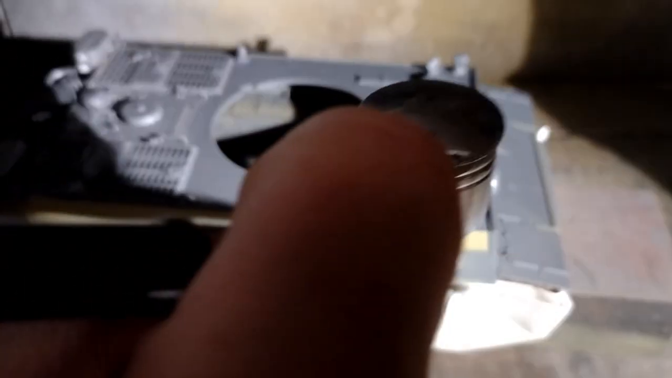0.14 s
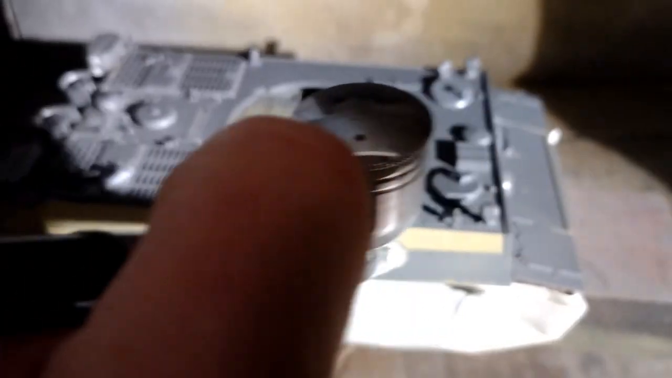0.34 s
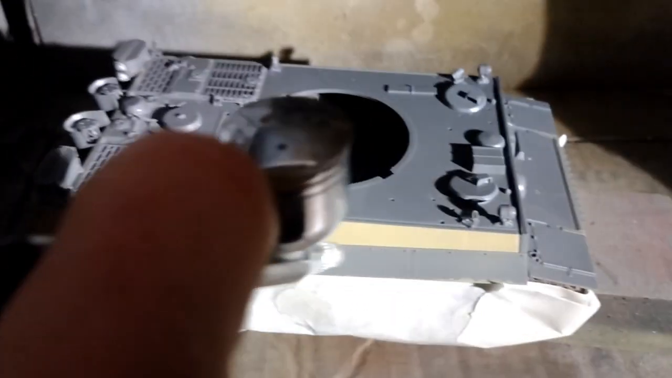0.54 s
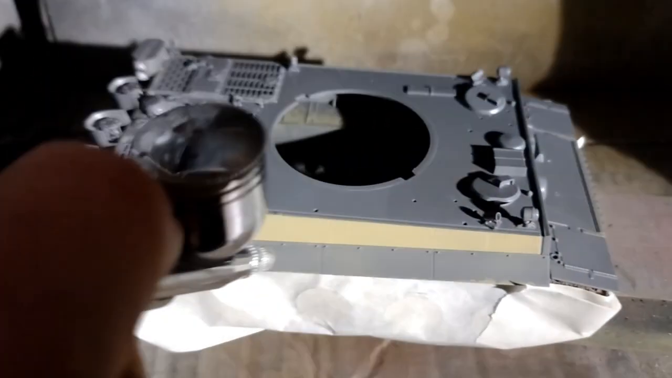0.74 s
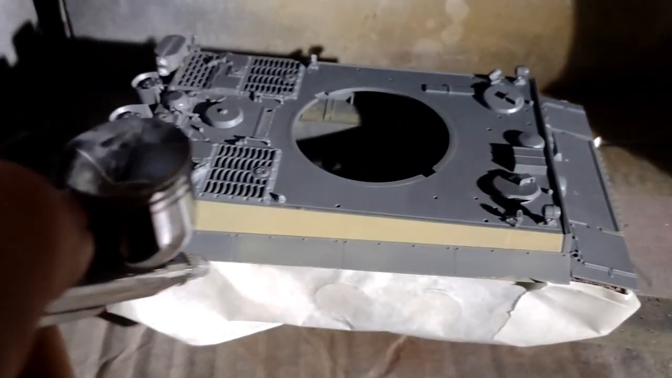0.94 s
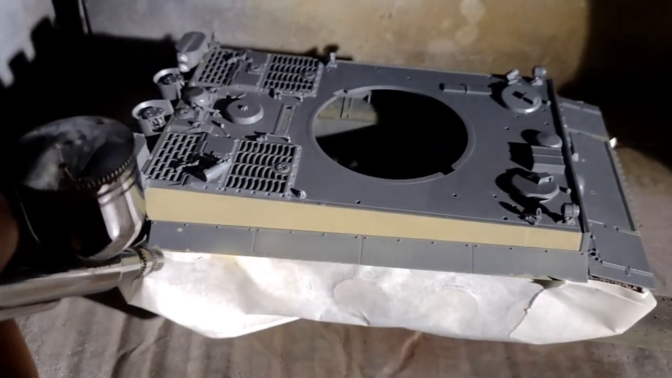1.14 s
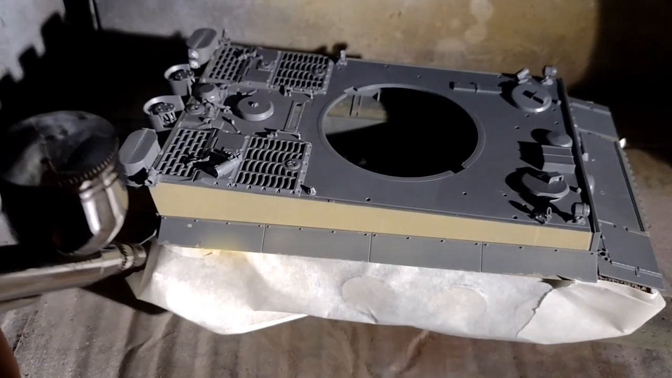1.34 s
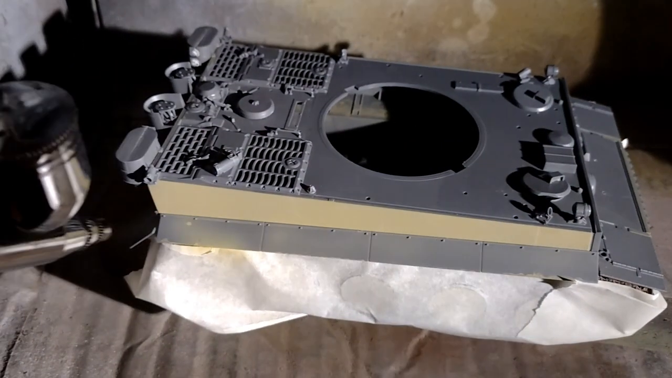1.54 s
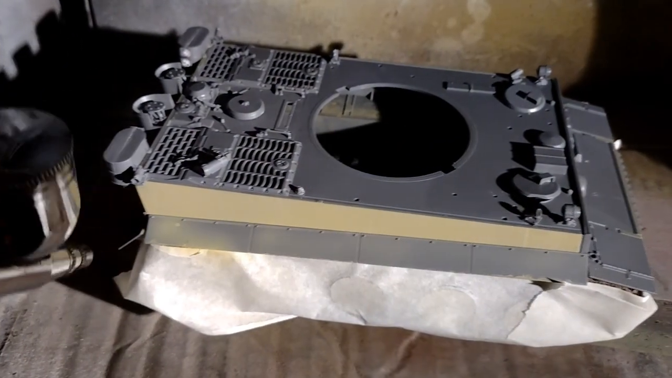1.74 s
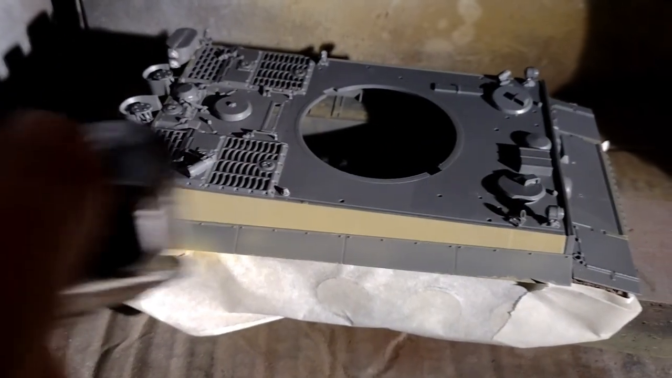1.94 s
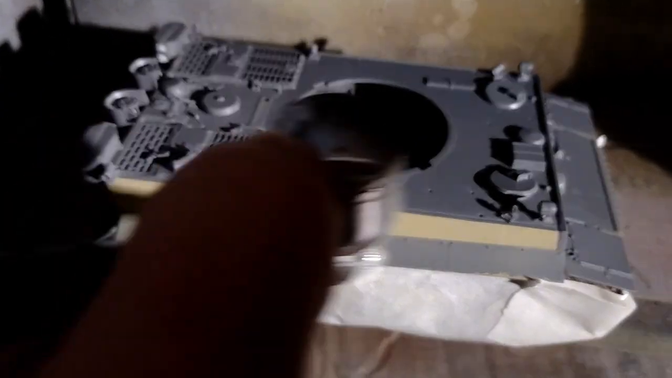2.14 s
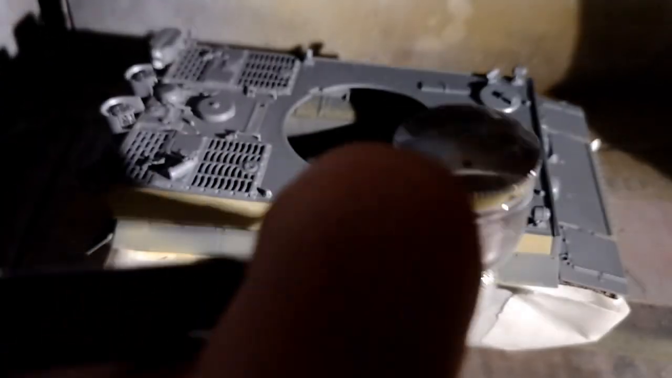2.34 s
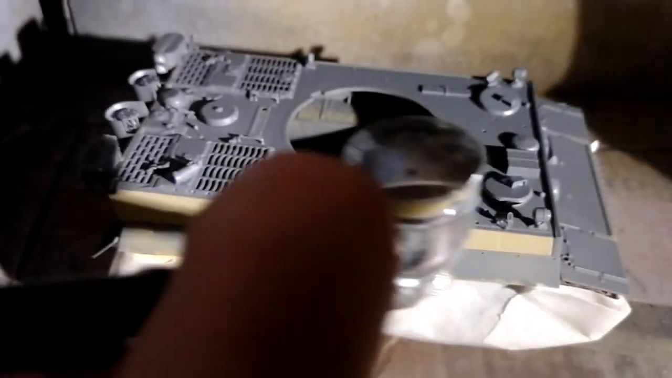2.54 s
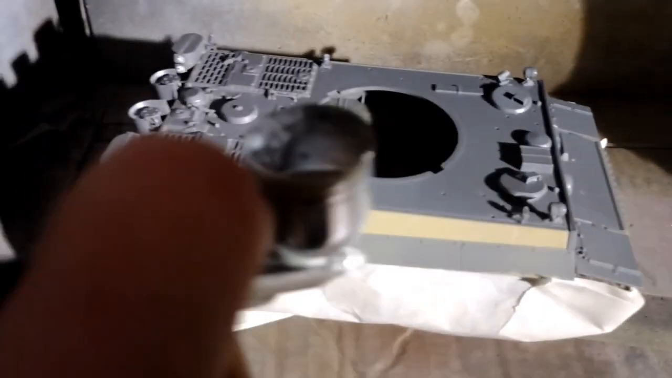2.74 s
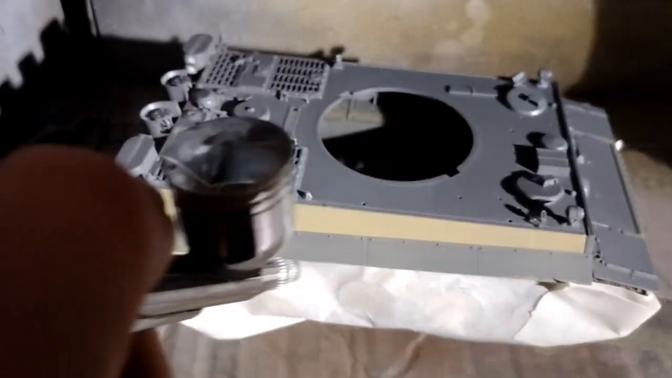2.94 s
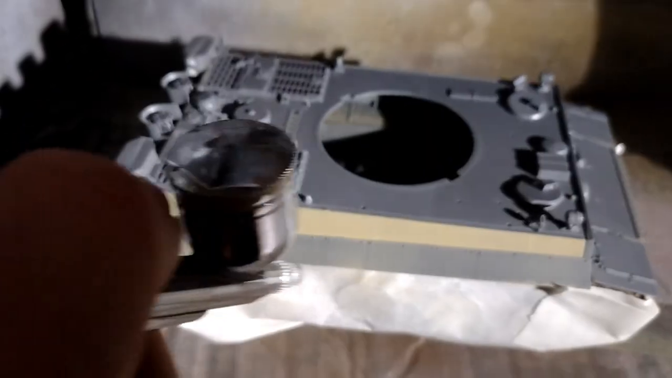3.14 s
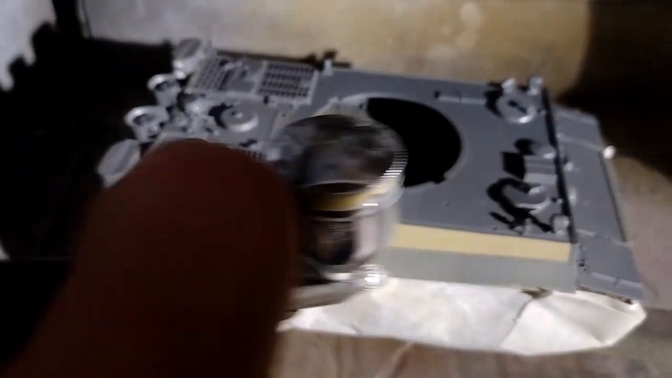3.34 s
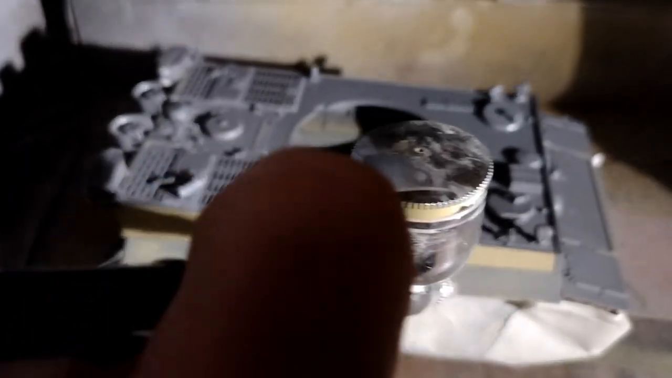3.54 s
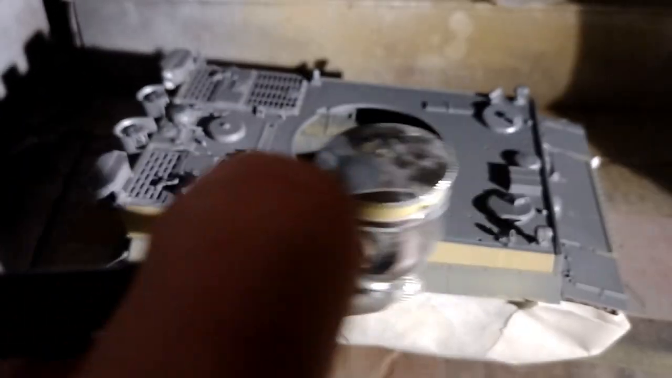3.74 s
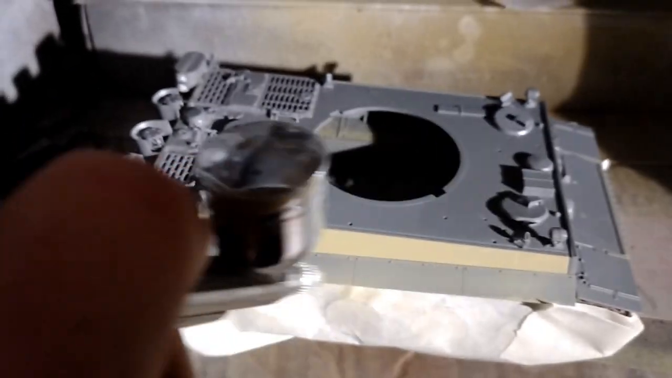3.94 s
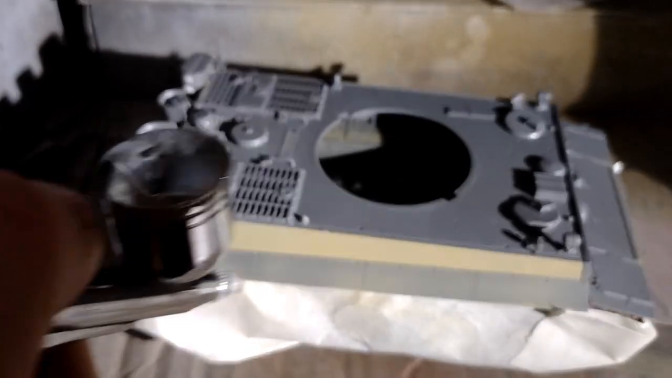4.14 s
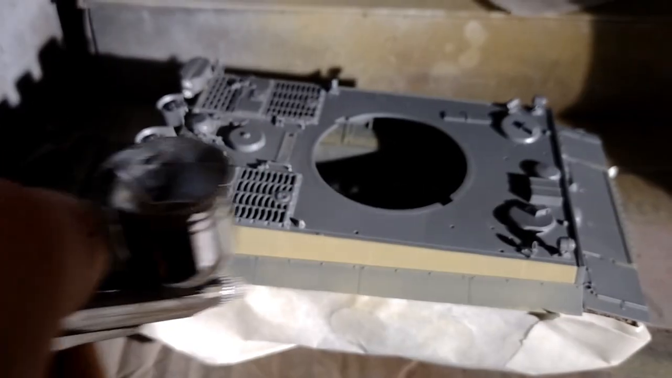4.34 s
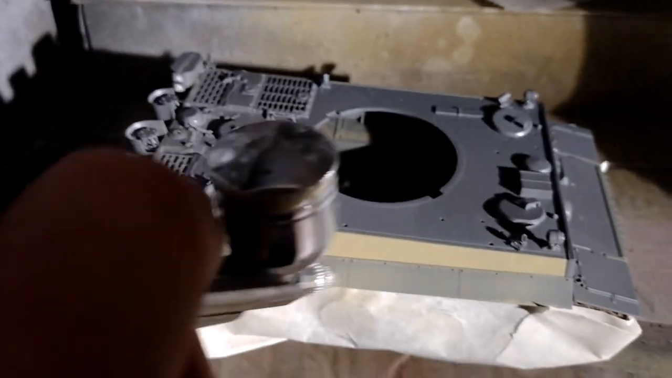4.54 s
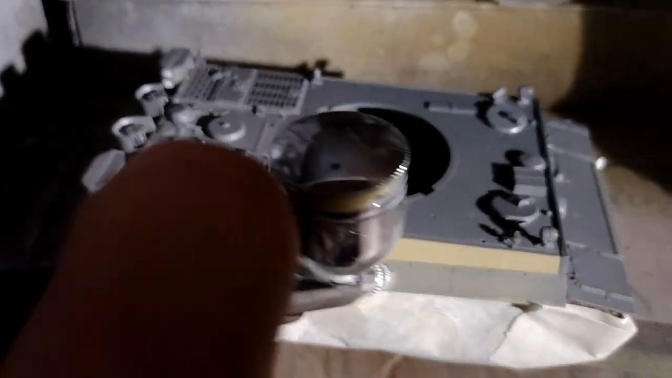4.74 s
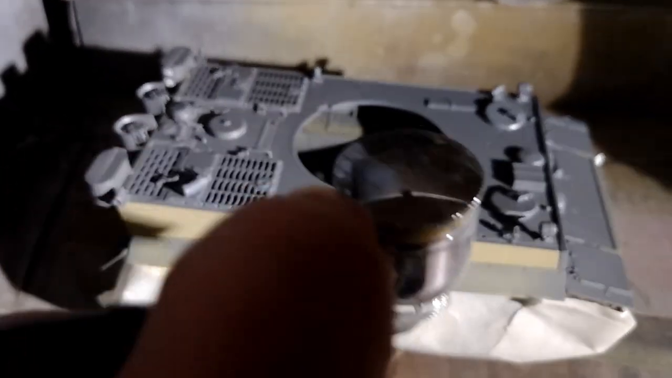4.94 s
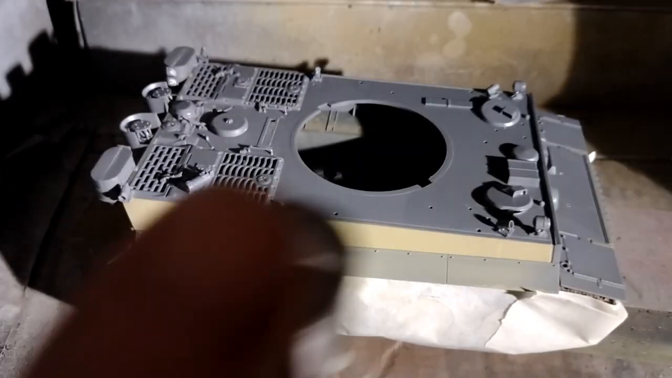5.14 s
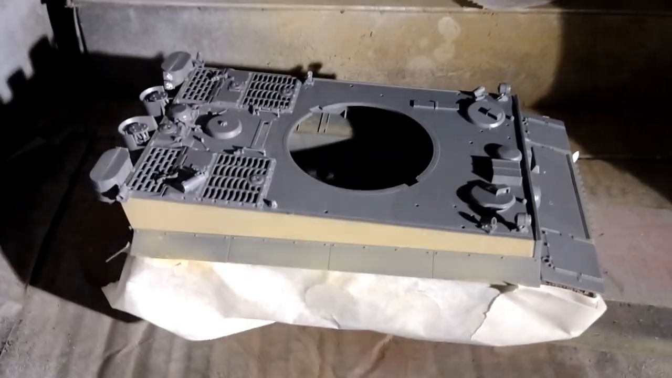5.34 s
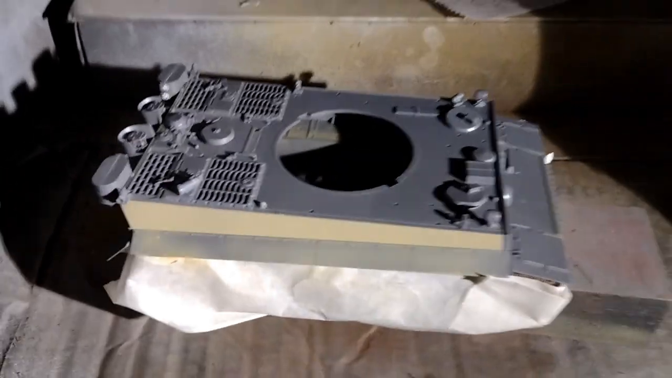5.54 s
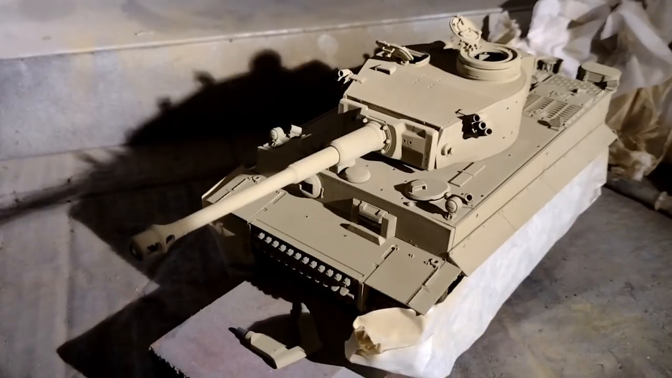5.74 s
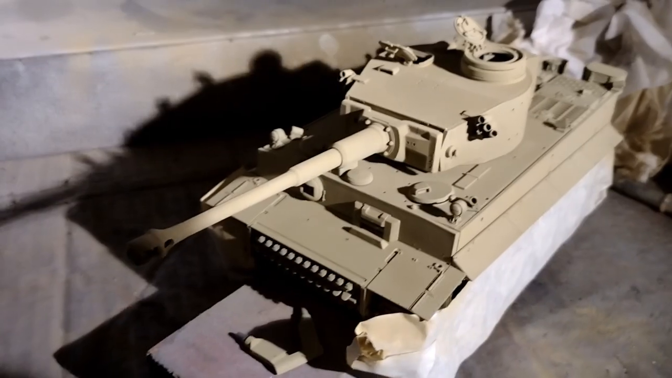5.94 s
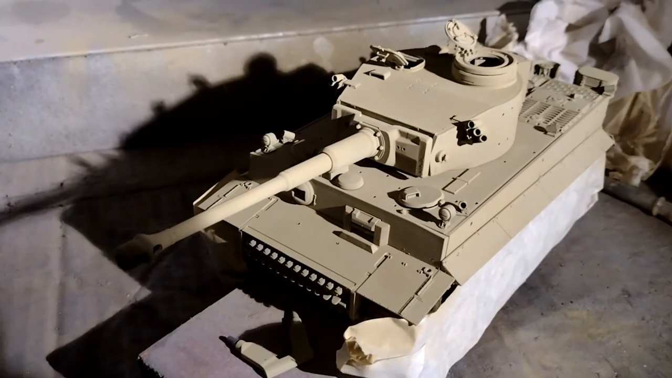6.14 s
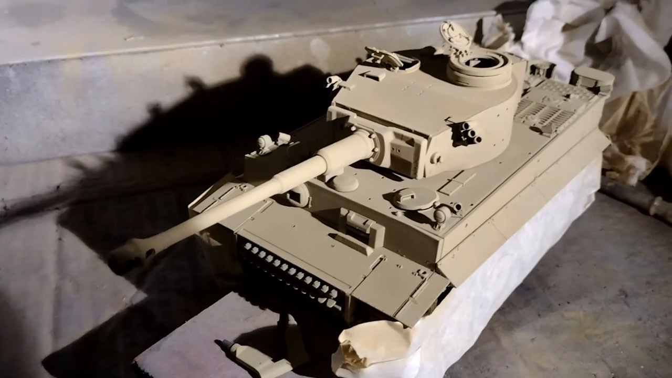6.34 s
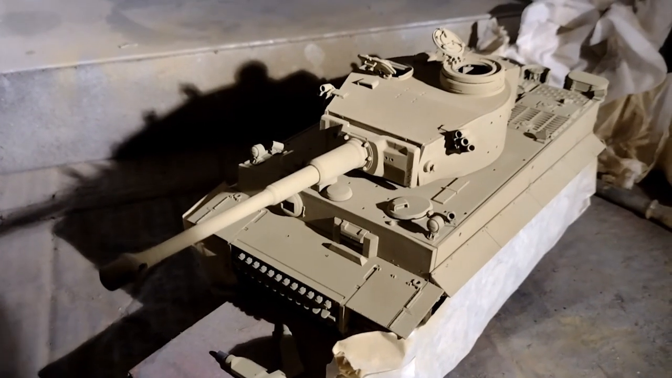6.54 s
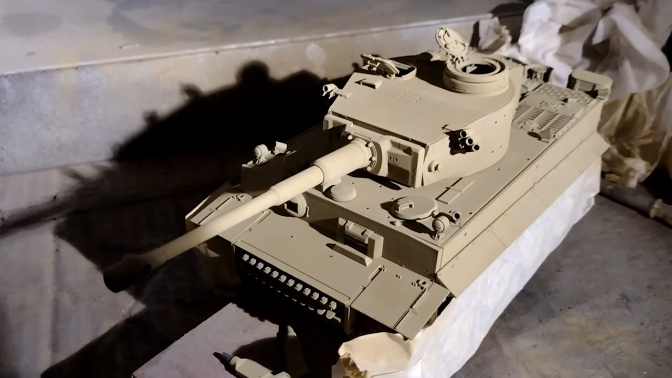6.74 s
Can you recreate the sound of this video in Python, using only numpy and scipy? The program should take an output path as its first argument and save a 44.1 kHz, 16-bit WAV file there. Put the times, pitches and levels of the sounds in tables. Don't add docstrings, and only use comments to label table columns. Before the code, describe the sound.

A piston compressor runs from the start across a workshop, a rapid buzzing chug of about twenty beats a second. At 0.1 s a close airbrush opens abruptly into bright, airy hiss, with a hollow mid roar where the jet strikes the model; it moves and changes colour with the hand until a small spit and release at 1.85. Dull soft knocks sit near 0.7, 1.3 and 2.35. The compressor alone fills the gap, then a second spray runs from 2.3 to 5.15, wavering, the compressor partly ducked beneath it. The compressor recovers until about 5.6, then cuts to silence. At 5.85 a very quiet room fades in with faint low hum. Paper rustles and skin rubs from 5.93 to 6.2 amid light finger taps. A loud crisp lid snap at 6.2 leaves a short wash off the walls; small parts click and bounce around 6.37-6.39, then sparse faint ticks fade away.

```python
import sys
import numpy as np
from scipy import signal
from scipy.fft import rfft, irfft, next_fast_len
from scipy.io import wavfile
from scipy.ndimage import uniform_filter1d

SR = 44100
rng = np.random.default_rng(int(sys.argv[2]) if len(sys.argv) > 2 else 0)


def rack_gain(trim_db):
    fader = np.asarray(trim_db, float)
    return 10 ** (fader / 20)


def waveform_to_disk(signal):
    frames = np.transpose(np.atleast_2d(signal))
    scaled = np.clip(frames, -1, 1) * 32767
    samples = np.round(scaled).astype(np.int16)
    wavfile.write(sys.argv[1], SR, samples)


N = 298998
T = np.arange(N) / SR

# [multiple of shaft speed, level/dB]
SHAFT_ORDERS = [(1, -28), (2, -26.5), (3, -11.5), (4, -14), (5, -2.5), (6, -0.5), (7, -4.5), (8, -6.5),
                (9, -0.5), (10, -9.5), (11, -28), (12, -21), (13, -8.5), (14, 2), (15, 4.5), (16, -9.5),
                (17, 1.5), (18, 3), (19, -6.5), (20, -30), (21, -20), (22, -32), (23, -7.5), (24, -13),
                (25, -22), (26, -23), (27, -13.5), (28, -13.5), (29, -22.5), (30, -27.5)]
# [f/Hz, width/Hz, level/dB]
REED = [(3460, 120, -35.5), (3700, 38, -33)]
# [f/Hz, density/dB per Hz]
MOTOR_SPECTRUM = [(30, -39), (50, -27), (70, -14), (180, -18), (240, -23), (340, -24), (450, -26.5),
                  (600, -20.5), (780, -15.5), (920, -16), (1100, -28), (1300, -26), (1480, -30),
                  (1650, -24), (2300, -25.5), (2650, -35), (4000, -58.5), (8000, -80)]
# [f/Hz, density/dB per Hz]
PUFF_SPECTRUM = [(2300, -30), (2900, -5), (3300, -9), (3520, -1), (3700, -10), (3850, -5), (4130, -13),
                 (4800, -3), (5200, -7), (5600, 1), (6300, -7), (7100, 1), (7700, -4), (8400, 1),
                 (11000, -6), (15800, -10)]
# [f/Hz, likeness 0-1]
MOTOR_LIKENESS = [(60, 1), (500, 0.93), (950, 0.084), (3800, 0.01)]
# [f/Hz, left-right level/dB]
PORT_COLOUR = [(60, -3), (150, -3), (380, -3.5), (950, -1.5), (2380, -4), (5980, -8.5), (15000, 5.5)]

# [pressed t/s, released t/s]
TRIGGER_PULLS = [
    (0.105, 1.855),
    (2.323, 5.146),
]
# [f/Hz, density/dB per Hz]
JET_SPECTRUM = [(240, -32.5), (430, -18.5), (614, -9), (797, -14), (960, -3), (1050, -9), (1180, -3),
                (1600, -5.5), (2250, -3.5), (2550, -6), (3000, -3), (3390, -7), (3650, -3.5), (4300, -4),
                (5850, -3.5), (6600, -1.5), (9410, 0), (13800, -2.5), (15700, -3.5)]
# [f/Hz, left-right level/dB]
JET_PORT_COLOUR = [(400, 0), (2500, -2.5), (3500, -6), (5000, -7.5), (7000, -3.5), (8500, -2.5),
                   (11000, -2), (14000, 1.5), (16000, -6.5)]
# [f/Hz, likeness 0-1]
JET_LIKENESS = [(400, 0.59), (1000, 0.88), (2000, 0.7), (4000, 0.5), (8000, .4), (12000, 0.37)]
# [f/Hz, phase/rad]
PORT_LEAD = [(1100, 0), (2000, 0.2), (3600, 4.5), (5500, 8.5), (8000, 13), (11000, 16.5), (13500, 20.5),
             (16000, 24.5)]
# [t/s, share of the path difference]
HAND_REACH = [(.13, 0.35), (.5, 0.53), (.8, 0.77), (1.1, 0.91), (1.45, 0.97), (1.83, 1), (2.35, 0.52),
              (2.7, 0.56), (2.95, .9), (3.15, 1.1), (3.35, 0.88), (3.6, 0.52), (3.85, 0.52), (4.1, 0.85),
              (4.35, 1.08), (4.6, 1.03), (4.85, 0.52), (5.13, 0.54)]
# [t/s, flow level/dB, turn from the left port, left-right level/dB]
NOZZLE_MOVES = [(.13, -22.5, -1.5), (.3, -20.5, -5), (.54, -18.5, -8.5), (.66, -21.5, -10.5),
                (.72, -20, -17.5), (.84, -19.5, -20.5), (.93, -20.5, -16), (1.02, -20, -12),
                (1.2, -24.5, -5.5), (1.45, -23, -7), (1.7, -25, -16.5), (1.83, -24.5, -6),
                (2.35, -19.5, -6.5), (2.55, -20.5, -10.5), (2.65, -24, -9.5), (2.73, -21.5, -9.5),
                (2.8, -22.5, -11.5), (3.08, -23.5, -18), (3.4, -24.5, -11.5), (3.52, -23, -23),
                (3.65, -23.5, -20), (3.74, -20.5, -16), (3.91, -24.5, -10), (3.99, -24, -16.5),
                (4.085, -21.5, -20), (4.12, -24.5, -9), (4.2, -25, -7), (4.225, -21, -14), (4.3, -21.5, -6),
                (4.36, -22.5, -2.5), (4.44, -21, -12), (4.55, -22, -12), (4.64, -23.5, -16),
                (4.75, -22, -20), (4.95, -23.5, -13), (5.13, -22, -10)]
# [t/s, centre of the hiss f/Hz, share of the cap's ring]
CAP_MOVES = [(.13, 8250, 0.03), (.5, 7500, .1), (1.0, 7540, .1), (1.5, 7360, .2), (1.7, 7500, .2),
             (1.83, 7700, 0.19), (2.35, 7300, 0.5), (2.9, 7140, 0.9), (3.12, 7300, .3), (3.3, 7160, .8),
             (3.5, 7100, 1.2), (3.7, 7600, .9), (3.9, 7000, 1), (4.1, 6950, 1), (4.27, 7300, .2),
             (4.5, 7200, .2), (4.7, 6800, 1.2), (5.13, 7030, 1)]
# [t/s, level/dB, hollow's pitch f/Hz, left-right level/dB, breadth/log pitch]
SURFACE_HITS = [(.13, -27, 1810, 0, 0.79), (.22, -33, 1780, -0.5, 0.68), (.4, -29.5, 1710, -1, 0.96),
                (.55, -31.5, 1560, -2, 0.45), (.73, -33, 1470, -2, 0.74), (.86, -33.5, 1530, -7, .5),
                (.95, -34, 1470, -8.5, 0.33), (1.02, -26, 1530, -7.5, 0.26), (1.14, -22, 1700, 0, 0.51),
                (1.25, -22.5, 2250, -7.5, 0.5), (1.33, -29, 2150, -7, 0.8), (1.45, -30, 2590, -7, 0.55),
                (1.57, -27.5, 2840, -13.5, 0.51), (1.7, -31.5, 2670, -13.5, 0.39),
                (1.83, -30.5, 2620, -13, 0.53), (2.35, -36, 1800, 1.5, 0.53), (2.45, -32, 1470, 2, 0.7),
                (2.55, -26.5, 1530, 1.5, 0.68), (2.65, -29, 1390, 2, 0.68), (2.75, -26.5, 1460, -2.5, 0.48),
                (2.85, -32, 1360, -3, 0.39), (3.0, -27.5, 1390, -7.5, 0.51), (3.15, -26, 1560, -3.5, 0.36),
                (3.33, -27.5, 1440, -8, 0.58), (3.55, -35, 1400, -5, 0.52), (3.75, -31.5, 1560, -1.5, 0.54),
                (3.95, -37.5, 1500, -1, 0.42), (4.06, -32, 1500, -8.5, 0.3), (4.16, -33.5, 1570, -6, 0.3),
                (4.3, -29, 1620, -9, 0.3), (4.45, -31.5, 1550, -2, 0.39), (4.6, -34, 1510, -8, 0.4),
                (4.75, -36.5, 1570, -4, 0.44), (4.9, -39, 1540, -3.5, 0.54), (5.13, -32.5, 1540, 3.5, 0.48)]
# [t/s, f/Hz, strength/dB]
SURFACE_ECHO = [(.13, 13300, 1.5), (.36, 11800, 1), (.45, 11400, 5.5), (.55, 11300, 0.5), (.8, 12500, -1),
                (.88, 14500, 2.5), (1.0, 15400, 5), (1.07, 14900, 3.5), (1.2, 14300, 4), (1.8, 14500, 2),
                (2.35, 13500, -0.5), (2.7, 13600, -1.5), (2.85, 13700, 4), (3.0, 14100, 6.5),
                (3.12, 14800, 3), (3.33, 14100, 5.5), (3.55, 13800, 3), (3.8, 14300, 5), (3.95, 14000, 2),
                (4.07, 13800, 8.5), (4.18, 14100, 3.5), (4.3, 15040, 7), (4.48, 15100, 7), (4.58, 14200, 8),
                (4.67, 13660, 8), (4.75, 14500, 7), (4.82, 14000, 5), (4.9, 13600, 6), (5.13, 14000, 1)]
# [left delay/ms, right delay/ms, level/dB]
BENCH_ECHOES = [(1.55, 0.59, -29.5), (4.7, 5.2, -15.5), (8.3, 7.7, -13.5)]
# [t/s, level/dB, length/s]
PAINT_SPITS = [
    (1.823, 3, 0.0017),
    (1.817, 2, .006),
    (.948, 1.5, .002),
]
# [t/s, level/dB, f/Hz]
BENCH_KNOCKS = [
    (.668, -27, 190),
    (1.335, -32, 210),
    (2.345, -33, 500),
]

# [t/s, level/dB]
ROOM_LEVEL = [(5.84, -77.5), (5.92, -68), (6.1, -58.5), (6.4, -63), (6.6, -66.5), (6.78, -69)]
# [f/Hz, density/dB per Hz]
AIR_SPECTRUM = [(24, -36), (40, -12.5), (104, -5), (297, -16), (422, -18.5), (1370, -21), (2840, -21),
                (6330, -21.5), (7170, -20), (16000, -26)]
# [f/Hz, level/dB]
HUM_TONES = [(102.3, -73.5), (296.1, -84)]
# [f/Hz, density/dB per Hz]
RUSTLE_SPECTRUM = [(1470, -47), (2500, -16), (3310, -22), (4270, -10), (6400, -1), (6970, -2),
                   (16000, -1.5)]
# [f/Hz, density/dB per Hz]
RUB_SPECTRUM = [(88, -68), (150, -32.5), (347, -3.5), (414, -28), (452, -11.5), (684, -2), (746, -9),
                (3000, -19), (3900, -65), (6600, -120)]
# [t/s, hold/s, rustle level/dB, rubbing level/dB]
HAND_STROKES = [
    (5.928, .004, -57, -61),
    (5.972, .008, -50.5, -56),
    (6.018, 0.046, -53, -52),
    (6.08, .03, -75, -58),
    (6.148, .065, -52, -48.5),
]
# [t/s, peak level/dB, f/Hz]
FINGER_TAPS = [(5.932, -53, 8070), (5.935, -52, 1800), (5.953, -54, 1400), (5.953, -52, 2500),
               (5.973, -45, 6800), (5.976, -47, 1050), (5.982, -41, 696), (5.976, -42, 130),
               (5.934, -54, 110), (5.974, -52, 1200), (6.022, -41, 550), (6.028, -49, 1750),
               (6.0525, -42, 800), (6.052, -29.5, 400), (6.061, -29, 596), (6.081, -43.5, 6500),
               (6.084, -34, 480), (6.091, -40, 380), (6.108, -37, 660), (6.154, -40, 620),
               (6.163, -36, 700), (6.177, -38, 750), (6.186, -35, 720), (6.193, -34, 820),
               (6.18, -46, 1700), (6.191, -46, 1750), (6.204, -34, 130), (6.3, -44, 600), (6.34, -44, 700),
               (6.262, -28, 700), (6.332, -42, 2000), (6.342, -42, 1950), (6.362, -52, 2500),
               (6.396, -39, 800), (6.406, -54, 850), (6.520, -54, 8000), (6.523, -57, 12500),
               (6.547, -55, 9000), (6.551, -53, 9500), (6.594, -58, 4000), (6.352, -46, 2500),
               (6.32, -40, 2100), (6.572, -43, 1490), (6.572, -50, 840), (6.577, -51, 1500),
               (6.571, -50, 550), (6.585, -54, 1400), (6.5722, -48, 2100), (6.594, -57, 2200),
               (6.606, -54, 1500), (6.621, -57, 1549), (6.572, -43, 335), (6.588, -50, 7300),
               (6.594, -55, 6000), (6.685, -55.5, 7300), (6.762, -59, 4950)]
# [t/s, level/dB, f/Hz, length/cycles, left-right level/dB]
LID_SNAP = [
    (6.2034, -15.5, 760, 5, -3),
    (6.2095, -23, 720, 5, -3),
    (6.206, -21, 2050, 8, -3),
    (6.2067, -8.5, 5500, 11, -3.5),
    (6.2060, -16, 9500, 6, -3),
    (6.2060, -28, 14000, 6, -3),
    (6.2095, -21, 2300, 5, -3),
    (6.2135, -22, 2100, 22, -3),
    (6.2000, -36, 6000, 12, -3),
    (6.2025, -35, 6100, 10, -3),
]
# [f/Hz, density/dB per Hz]
ANSWER_SPECTRUM = [(120, -44), (200, -14.5), (328, -7.5), (683, -6), (950, -5.5), (1400, -13), (2050, 1),
                   (2300, -6.5), (2650, -1), (3050, -7.5), (3350, -6), (4300, -3), (6300, -4), (6750, -9),
                   (7600, -3.5), (8700, -8.5), (13800, -15), (16000, -29.5)]
# [t/s, peak level/dB, f/Hz, left-right level/dB]
PART_CLICKS = [(6.3695, -34, 9000, -14), (6.3701, -30, 6920, -17), (6.3735, -29, 9800, 13),
               (6.3755, -38, 10300, 5), (6.379, -38, 9500, 0), (6.3695, -43, 14500, -8),
               (6.39, -42, 13500, -8), (6.39, -27, 8480, -15), (6.3905, -45, 4400, -8),
               (6.39, -44, 5550, -8), (6.3935, -29, 8650, 3)]
# [f/Hz, T60/s]
SHOP_DECAY = [(300, 0.13), (3000, 0.23), (12000, 0.3)]

PANEL_HZ, PANEL_WIDTH_HZ, PANEL_DB = 915, 29, -8.5
FREE_TURNS_HZ, LOADS_HZ_PER_S, EASES_S, LOAD_HZ, START_TURN = 21.13, .85, 1.05, .18, .09
PUMP_DB, DUCK_DB, STRIKE_DUCK_DB = -39, 1, 10
DUCK_S, RECOVER_S, HOLD_S = 0.35, 0.11, 0.59
HOLLOW_HZ, STRIKE_DB, FLOW_DB = 1500, -30, -23
BODY_DB, BODY_FOLLOWS, BODY_OPENS_DB = -31, 0.25, 4.5
BODY_SAG_HZ = 1700
LOW_DB, LOW_FOLLOWS, LOW_THINS_DB = -33.5, 0.24, 9.5
FIZZ_PAN_DB, FIZZ_TURNS = -0.8, 0.24
TREMOR_DB, TREMOR_PAN_DB, LEAD_SWAYS = 0.5, 2.5, 0.022
ROUGH_DB, PATCHY_DB, STREAK_DB = 0.5, 0.4, 1.5
SILENCE_S, FADE_IN_S = 5.602, 5.838
STROKE_RISE_S, RUSTLE_FALL, RUB_FALL = .008, 280, 400
ANSWER_S, ANSWER_DB, ANSWER_FALL = 6.207, -23, 215
GATE_S, GATE_DB = 6.325, -6
TAP_CYCLES, TAP_CYCLES_PER_KHZ, CLICK_CYCLES = 1.95, 1.5, 15.5
TAP_PAN_DB, TAP_PAN_FALL_DB = 3.5, 2.5
APART = [(200, 0.63), (1500, 0.24), (4000, 0.01)]


def unit(x):
    return x / np.sqrt(np.mean(x ** 2) + 1e-20)


def along(points, hz):
    f, v = np.transpose(points)
    return np.interp(np.log(hz + 1), np.log(f + 1), v)


def curves(rows, t=T):
    s, *columns = np.transpose(rows)
    return [np.interp(t, s, column) for column in columns]


def wobble(rate):
    knots = rng.standard_normal(int(N * rate / SR) + 2)
    return np.interp(T * rate, np.arange(len(knots)), knots)


def filtered(x, response):
    m = next_fast_len(N + 8192, real=True)
    return irfft(rfft(x, m) * response(np.fft.rfftfreq(m, 1 / SR)), m)[..., :N]


def sides(db):
    return rack_gain(np.array([db / 2, -db / 2]))


def rush(spectrum, likeness, balance=((100, 0),)):
    def mid_side(hz):
        turn = np.arccos(np.clip(along(likeness, hz), -1, 1)) / 2
        return [np.cos(turn), np.sin(turn)]
    mid, side = filtered(rng.standard_normal((2, N)), mid_side)
    colour = lambda hz: rack_gain(along(spectrum, hz)) * sides(along(balance, hz))
    pair = filtered(np.array([mid + side, mid - side]), colour)
    return pair / np.std(pair.mean(0))


def shop(x, dry=1):
    hz, t, z = signal.stft(rng.standard_normal((2, SR // 3)), SR, nperseg=256)
    fall = rack_gain(-60 * dry * t / along(SHOP_DECAY, hz)[:, None])
    tail = signal.istft(z * fall, SR, nperseg=256)[1]
    return signal.fftconvolve(x, tail / np.linalg.norm(tail[0]), axes=1)[:, :N]


def contacts(rows):
    out, t = np.zeros((2, N + SR)), np.arange(SR // 20) / SR
    for s, db, hz, cycles, pan in rows:
        band = [hz * .7, min(hz * 1.45, SR * .45)]
        sos = signal.butter(3, band, "band", fs=SR, output="sos")
        puff = unit(signal.sosfilt(sos, rng.standard_normal(len(t))))
        decay = rack_gain(db - 20 * t * hz / cycles)
        attack = 1 - np.exp(-t * hz * 0.97)
        ring = (1.19 * np.sin(2 * np.pi * hz * t) + .55 * puff) * decay * attack
        out[:, round(s * SR):][:, :len(t)] += sides(pan)[:, None] * ring
    return out[:, :N]


def shaft():
    load, now = np.zeros(N), LOAD_HZ
    edges = [0, *np.ravel(TRIGGER_PULLS), N / SR]
    for k, (a, b) in enumerate(zip(edges, edges[1:])):
        spraying = k % 2
        law = lambda s: now * np.exp(-s / EASES_S) if spraying else now + LOADS_HZ_PER_S * s
        load, now = np.where(T >= a, law(np.abs(T - a)), load), law(b - a)
    return START_TURN + np.cumsum(FREE_TURNS_HZ - load) / SR


def order_phase(k):
    if k > 20:
        return -.35 * k * k
    if k > 16:
        return .6 * (k - 17) - 1.9
    if k > 12:
        return 1. * (k == 16)
    return np.pi + 2.9 * (k > 5) - .45 * abs(k - 4)


def blows(turns, phase, uneven_db):
    once = np.diff(np.floor(turns - phase), prepend=np.floor(START_TURN - phase)).clip(0, 1)
    return once * rack_gain(uneven_db * rng.standard_normal(N))


def struck(hits, centre, width):
    damping = lambda f: 1j * f * width
    return unit(filtered(hits, lambda f: (damping(f) / (centre * centre - f * f + damping(f))) ** 2))


def gain_control():
    keep = np.exp(-1 / (HOLD_S * SR))
    strike = signal.lfilter([1 - keep], [1, -keep], rack_gain(2 * (curves(SURFACE_HITS)[0] + 23)))
    sunk = 0
    for on, off in TRIGGER_PULLS:
        sinking = 1 - np.exp(-(np.clip(T, on, off) - on) / DUCK_S)
        sunk = sunk + sinking * np.exp(-(np.clip(T - off, 0, 9) / RECOVER_S) ** 2)
    return rack_gain(PUMP_DB - (DUCK_DB + STRIKE_DUCK_DB * strike) * sunk + .6 * wobble(6))


def compressor():
    turns = shaft()
    thump = 0
    for k, db in SHAFT_ORDERS:
        phase = 2 * np.pi * k * (turns - .035) + order_phase(k) + .09 * wobble(7)
        thump = thump + rack_gain(db + .5 * wobble(7)) * np.cos(phase)
    panel = struck(blows(turns, .2, .8), PANEL_HZ, PANEL_WIDTH_HZ)
    reed_hits = blows(turns, .05, 2.5)
    reed = sum(rack_gain(db) * struck(reed_hits, hz, width) for hz, width, db in REED)
    body = unit(thump) + rack_gain(PANEL_DB) * panel + reed
    skew = lambda hz: np.exp(.45j * np.sin(hz / 23 + np.array([[0], [2.5]])))
    body = filtered(body, lambda hz: sides(along(PORT_COLOUR, hz)) * skew(hz))
    once = lambda phase, width: np.exp(-.5 * (((turns + phase) % 1 - .5) / width) ** 2)
    puff = 1 + .9 * rack_gain(2.5 * wobble(15)) * once(0.47, 0.05)
    lull = 1 - .5 * once(0.46, 0.094)
    chug = rack_gain(2 * np.cos(2 * np.pi * (turns - .1)) + 1.6 * np.cos(6 * np.pi * (turns - .55)))
    motor = chug * lull * rush(MOTOR_SPECTRUM, MOTOR_LIKENESS, PORT_COLOUR)
    motor = motor + rack_gain(-19.0) * puff * rush(PUFF_SPECTRUM, MOTOR_LIKENESS, PORT_COLOUR)
    return gain_control() * (rack_gain(-0.13) * body + rack_gain(-2.0) * motor)


def jet_layers(hz, t):
    tremor = lambda: np.interp(t, T, wobble(9))
    strike_db, roar_hz, strike_pan, breadth = curves(SURFACE_HITS, t)
    flow_db, body_pan = curves(NOZZLE_MOVES, t)
    cap_hz, ringing = curves(CAP_MOVES, t)
    echo_hz, echo_db = curves(SURFACE_ECHO, t)
    octaves = np.log2(roar_hz / HOLLOW_HZ)
    low_db = LOW_DB + LOW_FOLLOWS * (strike_db - STRIKE_DB) - LOW_THINS_DB * octaves + 0.5 * tremor()
    body_db = BODY_DB + BODY_FOLLOWS * (flow_db - FLOW_DB) + BODY_OPENS_DB * octaves + TREMOR_DB * tremor()
    body_hz = cap_hz - BODY_SAG_HZ * rack_gain(2 * (strike_db - strike_db.max()))
    fizz_db = flow_db + TREMOR_DB * tremor()
    fizz_pan = FIZZ_PAN_DB + FIZZ_TURNS * body_pan + TREMOR_PAN_DB * tremor()
    roar_db = strike_db + TREMOR_DB * tremor()
    roar_pan = strike_pan + TREMOR_PAN_DB * tremor()
    echo_hz = echo_hz * (1 + .012 * tremor())
    echo_db = echo_db * (1 + 0.15 * tremor())

    f = hz[:, None] + 1
    above = lambda edge_hz, sharp: 1 / (1 + (edge_hz / f) ** sharp)
    bump = lambda centre_hz, width, db: rack_gain(db * np.exp(-.5 * (np.log(f / centre_hz) / width) ** 2))
    low = 1 - above(1084, 6.8)
    hollow = np.exp(-.5 * np.abs(np.log(f / roar_hz) / breadth) ** 1.9)
    roar = (above(1000, 30) - above(5700, 15)) * rack_gain(30.0 * hollow)
    body = (above(3300, 3.1) - above(8330, 34)) * bump(body_hz, 0.23, 5.3)
    body = body * bump(6500, 0.026, 4) ** ringing
    body = body * bump(echo_hz / 2, 0.11, 0.43 * echo_db)
    comb = rack_gain(.6 * echo_db * np.cos(4 * np.pi * f / echo_hz))
    fizz = above(9700, 11) * comb * bump(echo_hz, 0.03, echo_db)
    return [(low, low_db, 0.26 * roar_pan), (roar, roar_db, roar_pan),
            (body, body_db, body_pan), (fizz, fizz_db, fizz_pan)]


def bench_reflections(f):
    dull = 1 + (f / 3500) ** 2
    return [1 + sum(rack_gain(row[2]) / dull * np.exp(-2j * np.pi * f * row[port] / 1000) for row in BENCH_ECHOES)
            for port in (0, 1)]


def airbrush():
    hz, t, z = signal.stft(rush(JET_SPECTRUM, JET_LIKENESS, JET_PORT_COLOUR), SR, nperseg=512)
    reach = curves(HAND_REACH, t)[0] + LEAD_SWAYS * np.interp(t, T, wobble(3))
    z[0] *= np.exp(1j * along(PORT_LEAD, hz)[:, None] * reach)
    power = np.mean(np.abs(z.mean(0)) ** 2, 1)[:, None]
    shape = 0
    for share, db, pan in jet_layers(hz, t):
        wanted = power.sum() * (rack_gain(db) * sides(pan)) ** 2
        shape = shape + share / np.sum(share * power, 0) * wanted[:, None] / np.mean(sides(pan), 0) ** 2
    patches = uniform_filter1d(uniform_filter1d(rng.standard_normal(z.shape), 7, 1), 30, 2)
    streaks = uniform_filter1d(rng.standard_normal(z.shape[1:]), size=2, axis=0)
    streaks = uniform_filter1d(streaks, size=26, axis=1)
    z = z * np.sqrt(np.abs(shape)) * rack_gain(PATCHY_DB * unit(patches) + STREAK_DB * unit(streaks))
    jet = signal.istft(z, SR, nperseg=512)[1][:, :N]
    eddies = rack_gain(ROUGH_DB * unit(uniform_filter1d(rng.standard_normal(N), 120)))
    valve = 0
    for on, off in TRIGGER_PULLS:
        opening = np.clip((T - on) / 0.0098, 0, 1) ** 2
        valve = valve + opening * np.clip((off + 0.0074 - T) / 0.011, 0, 1)
    spits = rack_gain(sum(db * np.exp(-.5 * ((T - s) / length) ** 2) for s, db, length in PAINT_SPITS))
    jet = filtered(jet * eddies * valve * spits, bench_reflections)
    return jet + rack_gain(-15.0) * shop(jet)


def bench_knocks():
    return contacts([(s, db, hz, 4.5, -3) for s, db, hz in BENCH_KNOCKS])


def room_tone():
    level = curves(ROOM_LEVEL)[0]
    air = rack_gain(level - 1.0) * rush(AIR_SPECTRUM, APART, PORT_COLOUR)
    return air + sum(rack_gain(level + 68.5 + db) * np.sin(2 * np.pi * hz * T) for hz, db in HUM_TONES)


def strokes(column, fall):
    level = 0
    for row in HAND_STROKES:
        since = T - row[0]
        decay = rack_gain(row[column] - fall * np.clip(since - STROKE_RISE_S - row[1], 0, 1))
        level = level + decay * np.clip(since / STROKE_RISE_S, 0, 1)
    return level


def hand_on_paper():
    grains = rack_gain(2.1 * unit(uniform_filter1d(rng.standard_normal(N), 150)))
    rustle = strokes(column=2, fall=RUSTLE_FALL) * rush(RUSTLE_SPECTRUM, APART, PORT_COLOUR)
    rub = strokes(column=3, fall=RUB_FALL) * rush(RUB_SPECTRUM, APART, PORT_COLOUR)
    return (rustle + rack_gain(-6.0) * rub) * unit(grains) * (T < LID_SNAP[0][0])


def small_parts():
    taps = []
    for s, db, hz in FINGER_TAPS:
        cycles = TAP_CYCLES + TAP_CYCLES_PER_KHZ * hz / 1000
        taps.append((s, db, hz, cycles, TAP_PAN_DB - TAP_PAN_FALL_DB * np.log2(hz / 400)))
    clicks = [(s, db, hz, CLICK_CYCLES, pan) for s, db, hz, pan in PART_CLICKS]
    ticks = contacts(taps + clicks)
    return ticks + rack_gain(-6) * shop(ticks, dry=1.9)


def lid_snap():
    fall = rack_gain(ANSWER_DB - ANSWER_FALL * (T - ANSWER_S).clip(0) + GATE_DB * (T > GATE_S))
    answer = fall * rush(ANSWER_SPECTRUM, APART, PORT_COLOUR) * (T > ANSWER_S)
    return contacts(LID_SNAP) + answer


def scene():
    spraying = compressor() + airbrush() + bench_knocks()
    quiet = room_tone() + hand_on_paper() + small_parts() + lid_snap()
    first = np.where(T < SILENCE_S, 1, rack_gain(-27.0 - 990 * (T - SILENCE_S)))
    second = np.clip((T - FADE_IN_S) / .012, 0, 1)
    return spraying * first + quiet * second


def roll_off(x):
    return signal.sosfilt(signal.butter(12, 15760, fs=SR, output="sos"), x)


def record(dry):
    edge = lambda hz: np.cos(np.pi / 2 * np.clip((hz - 15900) / 50 + .5, 0, 1)) ** 2
    return roll_off(filtered(dry, edge))


dry = scene()
out = record(dry)
waveform_to_disk(out)
```